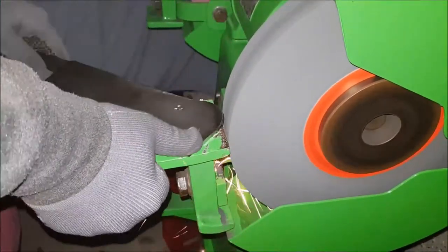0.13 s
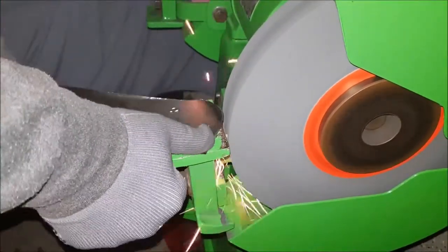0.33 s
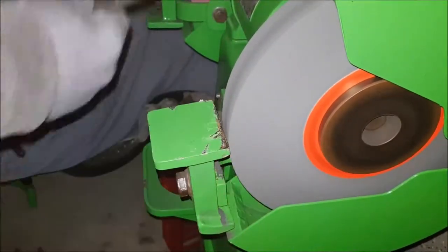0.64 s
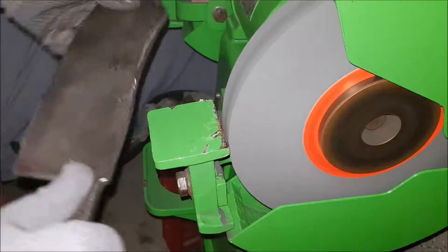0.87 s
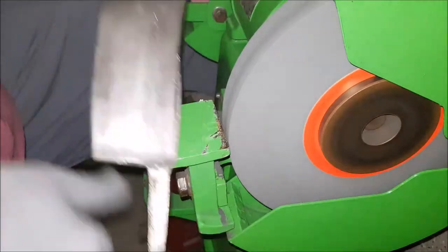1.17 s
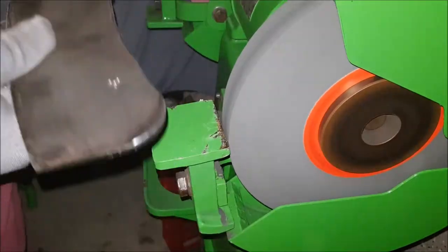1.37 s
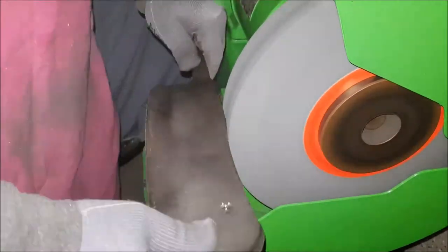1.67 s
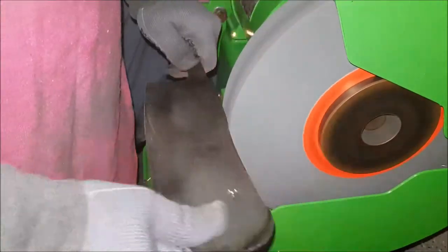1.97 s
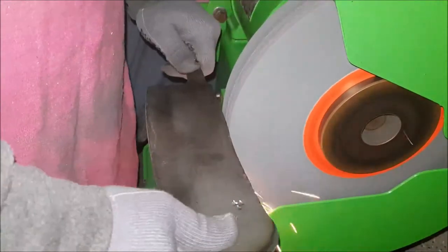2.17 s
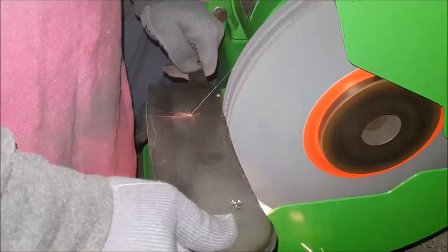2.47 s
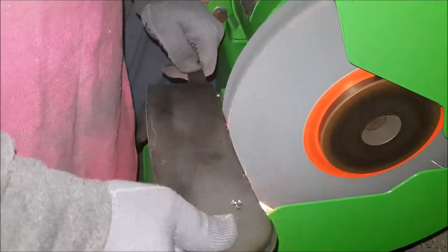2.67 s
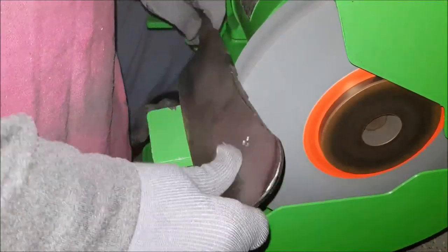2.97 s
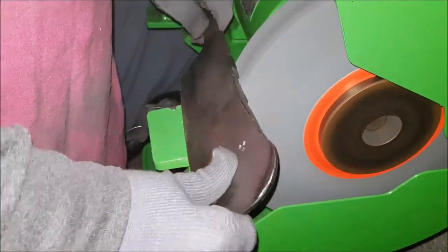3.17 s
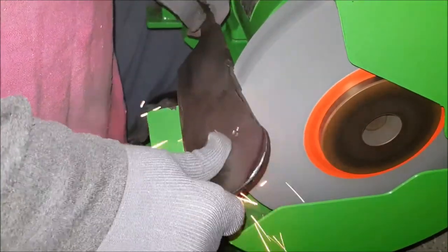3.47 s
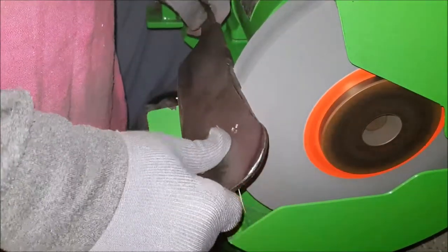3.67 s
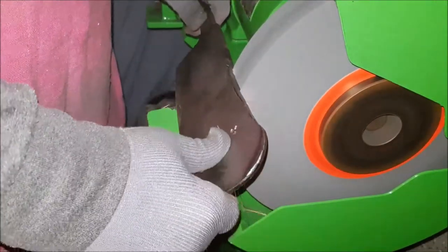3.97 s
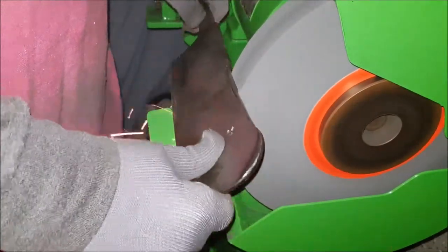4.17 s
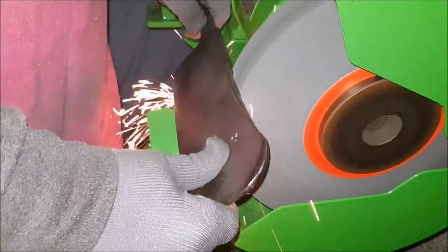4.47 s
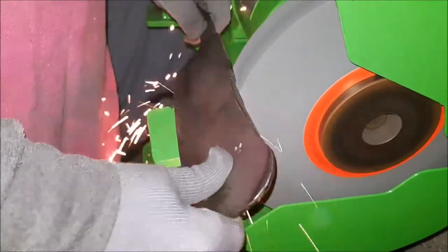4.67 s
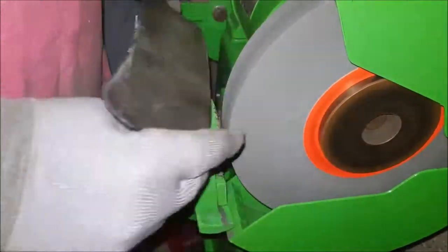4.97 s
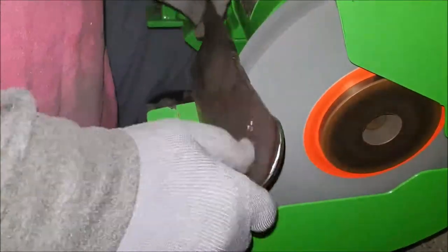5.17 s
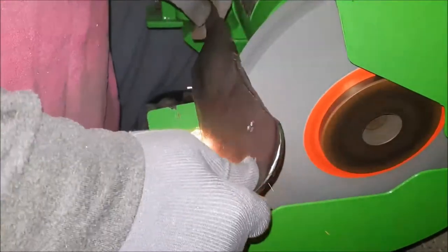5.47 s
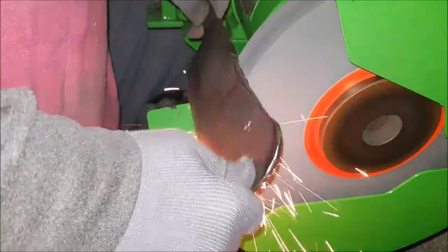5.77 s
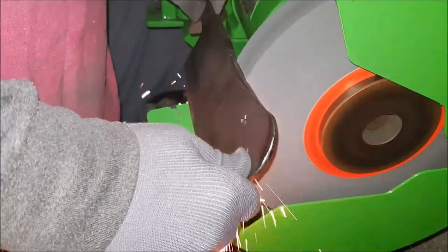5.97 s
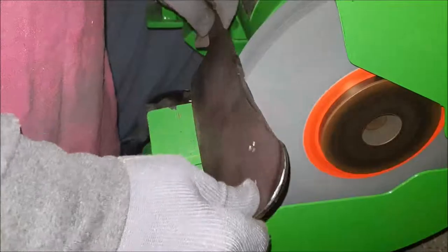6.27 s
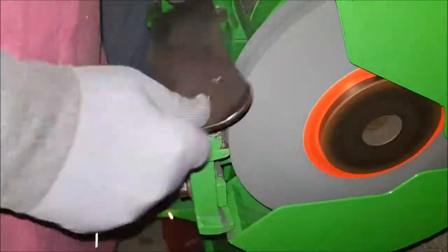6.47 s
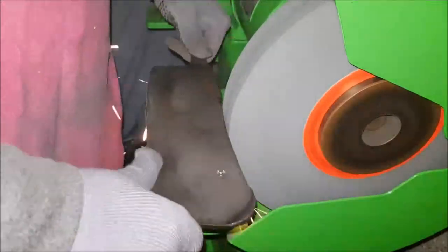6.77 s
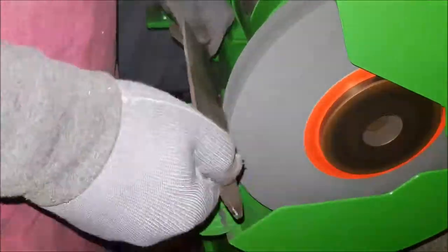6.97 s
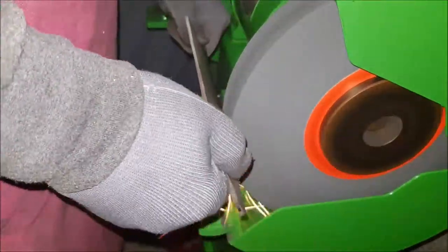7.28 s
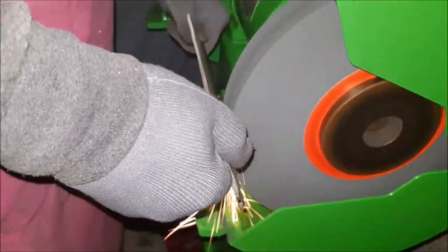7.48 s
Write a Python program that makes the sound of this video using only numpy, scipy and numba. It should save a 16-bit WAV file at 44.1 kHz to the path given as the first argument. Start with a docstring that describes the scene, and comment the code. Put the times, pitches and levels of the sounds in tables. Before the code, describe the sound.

A steel blade is ground in separate passes on a spinning abrasive wheel, heard very near and dry. Each contact brings a fluttering, gritty hiss and scrape that rings the metal, sometimes squealing; the motor's whine sinks under load and rises again in the pauses. Quick bright grazes, a knock and low thumps accompany handling, with the longest grinding in the middle and a fresh pass at the end.

```python
"""A bench grinder runs close to the stereo microphone, while a steel blade is pressed on its wheel in passes.
The motor hums, whines and rattles: wavering tones and filtered noise that swell between passes and sink under load.
Grit scratches the steel: beat-pulsed noise rings the blade, whose colour depends on how it is held.
Squeals are rough narrow tones and chatter a drone on the wheel's beat; short noise grazes and a knock
and low decaying thumps of the stand fall between and during the passes."""
import sys
import numpy as np
from scipy import signal
from scipy.fft import rfft, irfft
from scipy.io import wavfile
from scipy.ndimage import uniform_filter1d, map_coordinates
from numba import njit

SR = 44100
rng = np.random.default_rng(int(sys.argv[2]) if len(sys.argv) > 2 else 0)


def bounce(signal):
    """Save signal as a 16-bit WAV file at the path given by the first command-line argument."""
    frames = np.transpose(np.atleast_2d(signal))
    limited = np.clip(frames, -1, 1)
    pcm = np.round(limited * 32767).astype(np.int16)
    wavfile.write(sys.argv[1], SR, pcm)


N = 336042
T = np.arange(N) / SR
FREQS = np.maximum(np.arange(N // 2 + 1) * SR / N, 1)
BEAT_HZ, WHEEL_HZ = 99.85, 98.7  # mains beat; beat of the free wheel against the blade
TOP_HZ = 15700  # upper edge of the sound's band
WAVER_DB = 0.6  # spread of the slow waver of each motor tone


# Tones of rotor and bearings at free speed: pitch_hz, level_db (relative)
WHINE = [(1222.3, -49), (1422.0, -45), (1432.5, -44.5), (1521.8, -45.5), (1662.8, -43.5), (1762.7, -50),
         (1845.3, -36), (1862.6, -28.5), (1890.4, -39.5), (1963.5, -42.5), (2062.3, -32), (2109.7, -41),
         (2147.5, -37.5), (2162.1, -37), (2196, -41.5), (2396.2, -36), (2596.4, -36), (2802.5, -45),
         (2864.5, -40.5), (2987.6, -41.5), (3143.5, -34.5), (3257.5, -53), (3343.2, -37), (3483, -48),
         (3939.2, -44), (4424.2, -44), (4655.4, -48.5), (4903.9, -41.5), (4964.7, -41.5)]
# Mains hum of the motor: multiple of the mains beat, level_db (relative)
HUM = [(1, -68.5), (3, -53), (5, -60.5), (7, -58.5), (8, -41)]
WANDER_RAD = 0.04  # slow wander of each tone's phase


def tones(clock, port_lag=0.17, whine_db=2.5):
    """The whine follows the shaft, the hum the mains; each tone wavers and reaches the two ports out of step."""
    lines = [(hz, db + whine_db, clock) for hz, db in WHINE]
    lines += [(k * BEAT_HZ, db, T) for k, db in HUM]
    out = np.zeros((2, N))
    for index, (hz, db, time) in enumerate(lines):
        chance = walk(15)
        turns = (hz * time + rng.random()) % 1
        phase = (2 * np.pi * turns + WANDER_RAD * chance).astype(np.float32)
        lag = port_lag * hz / 2000 * (-1) ** index  # radians, the leading side alternates
        out += undb(db + WAVER_DB * chance) * np.sin(phase + np.float32([[lag], [-lag]]))
    return out


# Throb of the housing: multiple of the mains beat, depth
THROBS = [(1, 0.14), (2, 0.077), (3, 0.31)]
RUSH_DB, SING_DB = -39.5, -31  # bearings' rush and thicket of tones, before the housing (relative)
THICKET_SPREAD_DB = 3  # spread of strength among the thicket's tones


def rattle(clock, count=700):
    """Bearings shake the housing: a rush and a thicket of faint tones, throbbing with the mains."""
    thicket = np.zeros((2, len(FREQS)), complex)
    places = (np.arange(count) + rng.random(count) / 2) * len(FREQS) / count
    turned = np.exp(2j * np.pi * rng.random((2, count)))
    thicket[:, places.astype(int)] = turned * undb(THICKET_SPREAD_DB * rng.standard_normal(count))
    sing = np.array([looped(x, clock * SR) for x in irfft(thicket, N)])
    shake = undb(RUSH_DB) * rng.standard_normal((2, N)) + undb(SING_DB) * unit(sing)
    throb = 1 + sum(depth * np.cos(2 * np.pi * k * BEAT_HZ * T) for k, depth in THROBS)
    return spread(ring(shake * throb, housing()))


# Rattle of the housing and rush of the wheel: pitch_hz, level_db (relative)
HOUSING = [(25, -36), (100, -31.5), (270, -27), (600, -16.5), (1020, -17), (1900, 1), (3200, 0.5),
           (3700, -7), (4900, -7), (5600, -10.5), (8000, -14), (9000, -22), (14500, -26), (16000, -80)]
# Resonances of housing and guard: pitch_hz, width_hz, lift_db
GUARD = [(234, 53, 8.5), (860, 47, 13), (1296, 500, 6.5), (1852, 67, 8.5), (2145, 37, 2.5),
         (3410, 260, 4.5), (4840, 113, 6.5)]


def housing():
    """Response of housing and guard, with unit power."""
    body = response(HOUSING, GUARD)
    return body / np.sqrt(np.mean(abs(body) ** 2))


# Passes of the blade: start_s, end_s, press_s, ease_s, hiss_db and scrape_db at full pressure (relative,
# before the hand's lean), swell_db of the motor up to the next pass, grip
PASSES = [(-0.02, 0.27, 0.025, 0.11, -35.5, -43, 11, "tip"),
          (0.337, 0.491, 0.01, 0.023, -41, -43, 17.5, "tip"),
          (1.712, 2.06, 0.12, 0.011, -34, -36, 3, "flat"),
          (2.113, 2.791, 0.3, 0.033, -31, -36.5, 5.5, "flat"),
          (3.099, 4.907, 0.025, 0.013, -35.5, -34, 7.5, "edge"),
          (5.285, 6.523, 0.022, 0.035, -33, -35.5, 5.5, "edge"),
          (6.803, 6.905, 0.032, 0.031, -40.5, -43.5, 11, "tip"),
          (7.098, 7.674, 0.064, 0.015, -34, -42, -2, "tip")]
# A brief jump in the motor's level: start_s, end_s, jump_db
SURGE = (5.2, 5.28, 6.8)
STRIKE_RISE_S = 0.009  # build-up of this jump and of every graze and knock
LOADED_DB, DUCK_DB_PER_PERCENT = -15, 3  # motor gain under a light touch; drop per percent of slowing
RECOVER_S, SWELL_S, RECOVER_SHARE, SINK_S = 0.011, 0.47, 0.44, 0.14


def motor_level(slip):
    """Gain of the motor in dB: a quick recovery and slow swell after lift-off, sinking when the blade lands."""
    swell = np.zeros(N)
    for (_, lift, *_, swell_db, _), (land, *_) in zip(PASSES, PASSES[1:]):
        free_s = np.minimum(T, land) - lift
        rise = RECOVER_SHARE * ramp(free_s, RECOVER_S) + (1 - RECOVER_SHARE) * ramp(free_s, SWELL_S)
        swell = np.maximum(swell, swell_db * rise * (1 - ramp(T - land, SINK_S)))
    start, end, surge_db = SURGE
    surge = surge_db * ramp(T - start, STRIKE_RISE_S) * (1 - ramp(T - end, SINK_S))
    return LOADED_DB - DUCK_DB_PER_PERCENT * slip + swell + surge


# The blade rides loosely on the wheel's high spot: start_s, end_s
SKIPPING = (3.5, 4.2)
UNSTEADY_DB = 1.5  # unsteadiness of the hand


def grinding(beats, forces, slip, settle_s=0.28, scrape_hz=7000):
    """Each pass lands fluttering, settles into a hiss and lifts off; the hand is never quite steady."""
    firmness = sum(ramp(np.minimum(T - start, end - T), settle_s) for start, end, *_ in PASSES)
    firmness = firmness * (1 - arch(*SKIPPING))
    scratch = spread(grit(beats, firmness)) * undb(UNSTEADY_DB * walk(30))
    out = np.zeros((2, N))
    low = 1 / (1 + (FREQS / scrape_hz) ** 4)
    for grip, (hiss, scrape) in forces.items():
        body = blade(grip)
        treble = singing(ring(scratch * hiss, body * (1 - low)), slip, grip)
        out += placed(treble + ring(scratch * scrape, body * low), grip)
    return ringing_on(out)


TOUCH_DB = -6.5  # hiss of a first touch against full pressure


def contacts(lean, lift_s=0.012):
    """Each pass lands, presses in, holds and eases off: strength of hiss and low scrape for each grip."""
    forces = {grip: np.zeros((2, N)) for grip in PLACES}
    for start, end, press_s, ease_s, hiss_db, scrape_db, _, grip in PASSES:
        touching = ramp(np.minimum(T - start, end - T) + lift_s, lift_s)
        on = touching > 0
        light = 1 - ramp(T[on] - start, press_s) * ramp(end - T[on], ease_s)
        db = np.array([hiss_db + TOUCH_DB * light, np.full(len(light), scrape_db)])
        forces[grip][:, on] += touching[on] * undb(db + lean[:, on])
    return forces


# Hand pressure, one list per longer spell, only its change about the spell's mean counts:
# time_s, hiss_db, scrape_db
PRESSURE = [
    [(1.7, -31.5, -43), (1.83, -28, -30), (1.92, -29, -31), (2.07, -33.5, -34)],
    [(3.12, -35, -38), (3.4, -30, -37.5), (3.47, -28.5, -41), (3.7, -33.5, -37), (3.78, -29, -35),
     (4.106, -27.5, -43.5), (4.13, -40, -41), (4.396, -30.5, -39.5), (4.612, -36.5, -42.5),
     (4.722, -34.5, -39), (4.89, -27, -41)],
    [(5.36, -28, -37), (5.468, -32, -39), (5.792, -26.5, -40.5), (5.882, -30.5, -40.5), (6.144, -32.5, -38),
     (6.228, -34.5, -42.5), (6.374, -39, -41), (6.412, -32.5, -37), (6.476, -36, -44), (6.51, -29, -37)],
    [(7.08, -29.5, -44), (7.25, -30.5, -37.5), (7.48, -26, -38.5), (7.62, -28.5, -44.5)],
]


def leaning():
    """How much harder or softer than usual the hand presses: change of hiss and of low scrape, in dB."""
    out = np.zeros((2, N))
    for rows in PRESSURE:
        during = (T >= rows[0][0]) & (T <= rows[-1][0])
        db = np.array([curve(rows, axis=1), curve(rows, axis=2)])[:, during]
        out[:, during] = db - db.mean(axis=1, keepdims=True)
    return uniform_filter1d(out, size=800)


FIRM_BITE = 0.28  # depth of the wheel's bite under firm pressure
REPEAT = 1.25  # weight of grains that come round again against fresh ones


def grit(beats, firmness, grain_db=2, lumps=0.12, light_bite=0.39):
    """Grit strikes the steel in a pulse at each beat, deeper at a light touch than under pressure."""
    size = int(SR / BEAT_HZ)
    rim = uniform_filter1d(rng.standard_normal(size), size=45, mode="wrap")
    bite = light_bite + (FIRM_BITE - light_bite) * firmness
    bumps = lumps * looped(unit(rim - rim.mean()), beats * size)
    contact = np.exp(bite * np.cos(2 * np.pi * beats) + bumps)
    contact = contact / np.sqrt(uniform_filter1d(contact ** 2, size=2 * size))
    coarseness = np.minimum(rng.exponential(size=N), 4)
    fresh = unit(rng.standard_normal((2, N)) * undb(grain_db * coarseness))
    return unit(fresh + REPEAT * np.array([tracks(beats), tracks(beats)])) * contact


def tracks(beats, slide_rate=6, count=3):
    """The same grains come round again and again; the pattern changes as the blade slides across the wheel."""
    size = int(SR / BEAT_HZ)
    shares = np.array([walk(slide_rate) for _ in range(count)])
    fine = np.arange(size // 2 + 1) * BEAT_HZ > 1400  # only the treble of each pattern
    patterns = []
    for _ in range(count):
        grains = irfft(rfft(rng.standard_normal(size)) * fine, size)
        patterns.append(looped(grains, beats * size))
    return np.sum(shares * np.array(patterns), axis=0) / np.sqrt(np.sum(shares ** 2, axis=0))


# Scratch of grit on steel: pitch_hz, flat_db, edge_db, tip_db (relative)
SCRATCH = [(57.6, -32, -26, -24), (204, -17, -17, -26.5), (600, -8, -10, -5), (950, -9.5, -11.5, -8.5),
           (1705, 1, -2.5, 0), (2740, -2, -1, -1.5), (4070, 2.5, 0, -0.5), (5600, 3, -8.5, -5),
           (8840, -5, -12.5, -15.5), (9930, 1.5, 0, -1), (12040, 0.5, -1, -7), (13070, -1.5, 8.5, 0)]
# Resonances of the blade on the rest: pitch_hz, width_hz, flat_lift_db, edge_lift_db, tip_lift_db
BLADE = [(241, 148, 6.5, 2, 19.5), (511, 39, 1, 1.5, 8), (869.5, 41, 14.5, 9, 16), (1226, 230, 11.5, 7, 10),
         (1660, 89, 10, 8.5, 8), (3290, 200, 10, 7, 15), (7610, 2140, 0.5, 12, 9.5)]


def blade(grip):
    """Response of the blade in one grip, with unit power in its hiss band."""
    column = ["flat", "edge", "tip"].index(grip)
    body = response(np.array(SCRATCH)[:, [0, 1 + column]], np.array(BLADE)[:, [0, 1, 2 + column]])
    hiss_band = (FREQS > 9000) & (FREQS < TOP_HZ)
    return body / np.sqrt(np.mean(abs(body * hiss_band) ** 2))


# High modes of the blade: pitch_hz, width_hz, rise (percent per percent of slowing, before STIFFENING),
# flat_db, edge_db, tip_db (relative)
HIGH_MODES = [(9420, 200, 1.5, 15.5, 14, 9), (10170, 240, -1.5, 5.5, -4, -6), (11200, 69, -1, 12, -19, -20),
              (12550, 300, 0, -2, 6, 8), (13020, 290, 3.5, 13, -2.5, 3), (14520, 160, 2.7, 14, 9, -4),
              (14200, 210, -25, -8, -15, -7)]
# Share of that rise in each grip
STIFFENING = {"flat": 0.089, "edge": 0.6, "tip": 0.45}
MODE_DRIFT, SWAY_DB = 0.004, 2.8  # chance drift (share of pitch) and sway of the modes


def singing(x, slip, grip):
    """The hiss rings the blade's high modes; load shifts them, and they drift and sway as the contact slides."""
    drive, out = x.sum(axis=0) / np.sqrt(2), x
    for hz, width, rise, *levels in HIGH_MODES:
        centre = hz * (1 + STIFFENING[grip] * rise * slip / 100 + MODE_DRIFT * walk(6))
        mode = bandpass(drive, np.tan(np.pi * np.minimum(centre, TOP_HZ) / SR), width / hz)
        out = out + undb(levels[list(PLACES).index(grip)] + SWAY_DB * walk(8)) * mode
    return out * np.std(x) / np.std(out)  # keep the overall level


# Where the scratch sits before the microphone in each grip: left_minus_right_db in the far treble,
# left_lead_s (in full above 4 kHz)
PLACES = {"flat": (0, -0.000018), "edge": (4.3, 0.000017), "tip": (0, .000014)}


def placed(x, grip, shadow_hz=7000):
    """Hand and blade can shade the treble on one side, and it reaches one port first."""
    pan_db, lead = PLACES[grip]
    shade = panned(pan_db * FREQS ** 2 / (FREQS ** 2 + shadow_hz ** 2))
    turn = np.pi * FREQS * lead * np.clip(FREQS / 2000 - 1, 0, 1)
    return ring(x, shade * np.exp(1j * np.array([turn, -turn])))


def ringing_on(x, tail_db=-7, tail_s=0.038, tail_hz=1400):
    """The low notes of blade and stand linger briefly after the contact, as a decaying noise tail."""
    tail = rfft(rng.standard_normal((2, N)) * np.exp(-T / tail_s))
    return x + undb(tail_db) * ring(x, tail / np.std(tail) / (1 + (FREQS / tail_hz) ** 4))


# The blade sings or rasps on one of its modes: start_s, end_s, pitch_hz, width_hz, level_db (relative)
SQUEALS = [(1.738, 1.84, 1680, 14, -34), (1.84, 1.916, 1645, 8, -29), (1.917, 1.997, 1610, 11, -38),
           (2, 2.073, 1636, 8, -33.5), (2.097, 2.24, 1645, 14, -39.5), (2.237, 2.42, 1664, 6.8, -38),
           (2.598, 2.79, 1837, 8, -34), (2.88, 2.903, 12650, 132, -30), (3.26, 3.446, 6880, 90, -42.5),
           (3.785, 3.906, 3370, 190, -40.5), (3.815, 4.13, 3960, 200, -44), (3.795, 4.12, 9700, 250, -47.5),
           (4.125, 4.214, 14600, 200, -27), (5.55, 5.935, 7850, 115, -42.5),
           (5.333, 6.193, 14700, 180, -33), (7.15, 7.52, 1303, 350, -45), (7.22, 7.334, 3570, 650, -43)]
SQUEAL_SAG, SQUEAL_WAVER = 0.008, 0.003  # shares of pitch: sag from start to end, waver
FLUTTER = 0.55  # depth of the rasp's pulse on the wheel's beat


def squeals(beats, steady=0.95):
    """Friction feeds one mode in bursts that sag, waver and pulse with the wheel; narrow ones hold a clear core."""
    out, waver = np.zeros(N), SQUEAL_WAVER * walk(40)
    for start, end, hz, width, db in SQUEALS:
        pitch = hz * (1 + SQUEAL_SAG * (0.5 - ramp(T - start, end - start)) + waver)
        phase = 2 * np.pi * np.cumsum(pitch) / SR
        core = steady * min(20 / width, 1)
        rasp = (1 - core) * rough_tone(phase, width) * (1 + FLUTTER * np.cos(2 * np.pi * beats))
        out += undb(db) * arch(start, end) * (core * np.cos(phase) * np.sqrt(2) + rasp)
    return placed(out, "edge")


def rough_tone(phase, width_hz):
    """A tone fed by friction: its strength and phase stumble over a narrow band."""
    return walk(width_hz) * np.cos(phase) + walk(width_hz) * np.sin(phase)


# Spells of chatter under hard pressure: start_s, end_s, level_db (relative)
CHATTER = [(1.75, 2.045, -48), (2.21, 2.872, -47.5)]
# Partials of the chatter: multiple of the wheel's beat, level_db (relative)
CHATTER_ORDERS = [(4, -15), (5, -8.5), (7, -0.5), (9, 2.5), (13, 5), (17, 3), (19, 7), (22, 2), (25, -2),
                  (33, -1), (35, 1), (36, -13), (37, -8)]


def chatter(beats):
    """Pressed hard, the blade drones on multiples of the wheel's beat, sagging in pitch with the wheel."""
    drone = np.zeros(N)
    for k, db in CHATTER_ORDERS:
        strength = undb(db + 2 * WAVER_DB * walk(16))
        drone += strength * np.sin(2 * np.pi * (k * beats + rng.random()))
    return drone * sum(undb(db) * arch(start, end) for start, end, db in CHATTER)


# Brief grazes of the blade on the wheel: time_s, level_db (before graze_db)
GRAZES = [(1.086, -29.5), (1.284, -37), (1.6726, -23), (2.8838, -30.5), (3.0677, -30), (5.252, -34),
          (6.505, -27), (6.76, -28.5), (6.992, -29)]
# The blade knocks on the rest: time_s, level_db (before knock_db)
KNOCKS = [(5.2036, -22)]
# Dull thumps of the stand: time_s, level_db, decay_s
THUMPS = [(1.112, -50, 0.045), (1.305, -46.5, 0.042), (1.699, -44.5, 0.034), (1.903, -47.5, .05),
          (2.499, -51, 0.0064), (2.711, -50, .008), (2.763, -41, 0.0041), (2.81, -54, 0.046),
          (5.23, -50, 0.051)]


def touches(slip, graze_db=-10, knock_db=-9, thump_hz=243):
    """The edge grazes the wheel with a bright tick; the blade knocks the rest; the stand thumps low."""
    grazes = ring(strikes(GRAZES, decay_s=0.0091, rebound=0.099), blade("edge"))
    grazes = singing(grazes, slip, "edge")
    knocks = ring(strikes(KNOCKS, decay_s=0.0024, rebound=0.18), housing())
    thumps = np.zeros(N)
    for s, db, decay_s in THUMPS:
        fade = (T >= s) * np.exp(-abs(T - s) / decay_s)
        thumps += undb(db) * fade * np.sin(2 * np.pi * thump_hz * (T - s))
    return undb(graze_db) * grazes + undb(knock_db) * knocks + thumps


def strikes(rows, decay_s, rebound):
    """Short noise scratches, each with a weaker second one a mains beat later."""
    push = np.zeros(N)
    for s, db in rows:
        for start, size in [(s, 1), (s + 1 / BEAT_HZ, rebound)]:
            shape = np.interp(T - start, [-STRIKE_RISE_S, 0, decay_s, 3 * decay_s], [0, 1, 1 / np.e, 0])
            push += size * undb(db) * shape
    return spread(push * rng.standard_normal((2, N)))


# Likeness of the left and right ports: pitch_hz, correlation
LIKENESS = [(100, 0.33), (800, 0.89), (2500, 0.21), (4400, 0.18), (15000, 0.049)]


def spread(pair):
    """Turn two unrelated signals into left and right, most alike near 800 Hz."""
    alike = np.clip(across(LIKENESS), 0, 1)
    mid, side = ring(pair[0], np.sqrt(1 + alike)), ring(pair[1], np.sqrt(1 - alike))
    return np.array([mid + side, mid - side])


def panned(db):
    """Left and right gains for a level difference."""
    return undb(np.array([db, -db]) / 2).reshape(2, -1)


def response(slope, resonances):
    """Causal response of a body: a broad slope lifted at its resonances."""
    db = across(slope)
    db = db + sum(lift / (1 + (2 * (FREQS - hz) / width) ** 2) for hz, width, lift in resonances)
    cepstrum = irfft(np.log(undb(db)), N)
    return np.exp(rfft(2 * cepstrum * (np.arange(N) < N // 2)) - cepstrum[0])  # minimum phase


def ring(x, body):
    """Sound x through a response."""
    return irfft(rfft(x) * body, N)


@njit
def bandpass(x, slope, damping):
    """State-variable resonance with a moving centre, gain 1 at its top."""
    out, band, low = np.empty(len(x)), 0., 0.
    for i in range(len(x)):
        g = slope[i]
        v = (band + g * (x[i] + 1e-18 - low)) / (1 + g * (g + damping))
        band, low, out[i] = 2 * v - band, low + 2 * g * v, damping * v
    return out


def looped(table, place):
    """Read a repeating signal smoothly at a moving place, counted in samples."""
    fine = signal.resample(table, len(table) * 8)
    return map_coordinates(fine, [place * 8], order=1, mode="grid-wrap")


def walk(rate):
    """Slow chance with a spread near 1: straight lines between up to 4096 random points, rate per second."""
    return 1.2 * np.interp(T * rate, np.arange(4096), rng.standard_normal(4096))


def ramp(since_s, length_s):
    """Rise from 0 to 1 over a length of time."""
    return np.clip(since_s / length_s, 0, 1)


def arch(start, end):
    """A rounded swell between two times."""
    return np.sqrt(np.abs(np.sin(np.pi * ramp(T - start, end - start))))


def curve(rows, axis=1):
    """One column of a timed table at every sample."""
    rows = np.array(rows)
    return np.interp(T, rows[:, 0], rows[:, axis])


def across(points):
    """Join (Hz, value) points on a log-frequency axis."""
    hz, value = np.transpose(points)
    return np.interp(np.log(FREQS), np.log(hz), value)


def undb(db):
    """Decibels to gain."""
    return 10 ** (np.asarray(db) / 20)


def unit(x):
    """Scale to rms 1."""
    return x / np.sqrt(np.mean(x ** 2))


# Slowing of the shaft under the blade, below zero when it runs fast: time_s, slowing_percent
SLOWING = [(0, 0.5), (.55, 0), (1.75, 0), (1.9, 0.93), (2.1, .1), (2.27, .8), (2.4, 1.08), (2.52, 3),
           (2.76, 1.67), (2.9, 0), (3.12, 0), (3.33, 0.94), (3.5, 0.06), (3.95, 1.52), (4.1, 1.36),
           (4.16, 0.98), (4.88, 0), (5.0, -0.5), (5.3, 0), (5.7, 1.44), (6.0, 1.24), (6.5, 1.16),
           (6.6, -0.5), (7.13, 0.5), (7.25, 1.13), (7.38, 0.7), (7.62, -0.44)]


def scene():
    """One shaft drives whine, rattle and the wheel's beat: its clock runs slow under load."""
    forces = contacts(leaning())
    slip = curve(SLOWING)
    clock = np.cumsum(1 - slip / 100) / SR
    beats = WHEEL_HZ * clock
    motor = (tones(clock) + rattle(clock)) * undb(motor_level(slip)) * panned(0.97)  # slightly left
    return motor + grinding(beats, forces, slip) + squeals(beats) + chatter(beats) + touches(slip)


def record(dry):
    """Little sounds above about 15.7 kHz: a steep low-pass."""
    return signal.sosfilt(signal.ellip(10, .2, 80, TOP_HZ, fs=SR, output="sos"), dry)


dry = scene()
out = record(dry)
bounce(out)
```